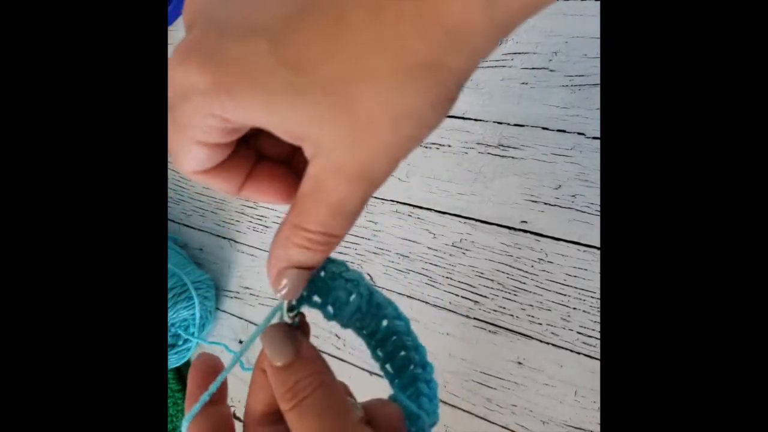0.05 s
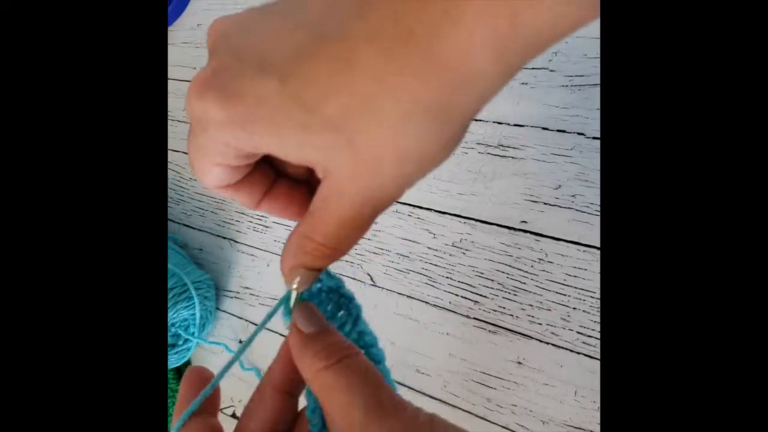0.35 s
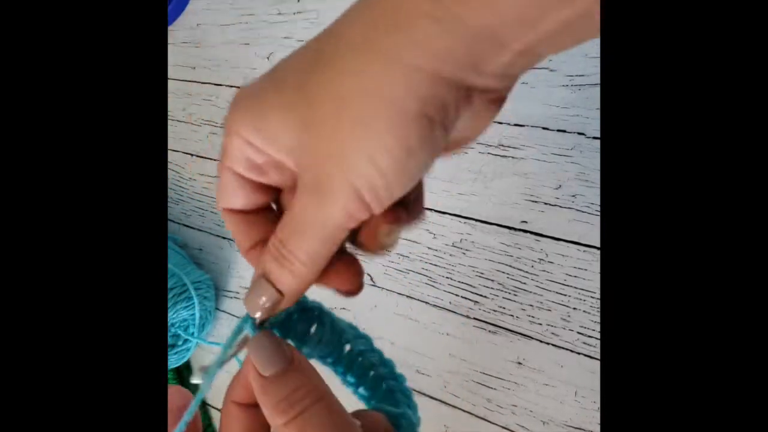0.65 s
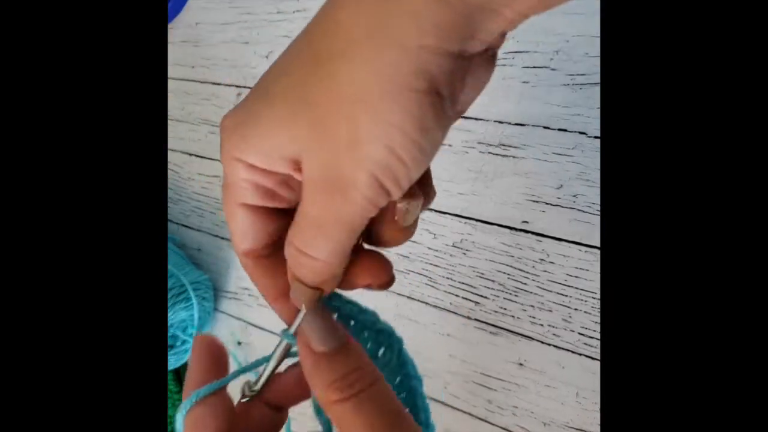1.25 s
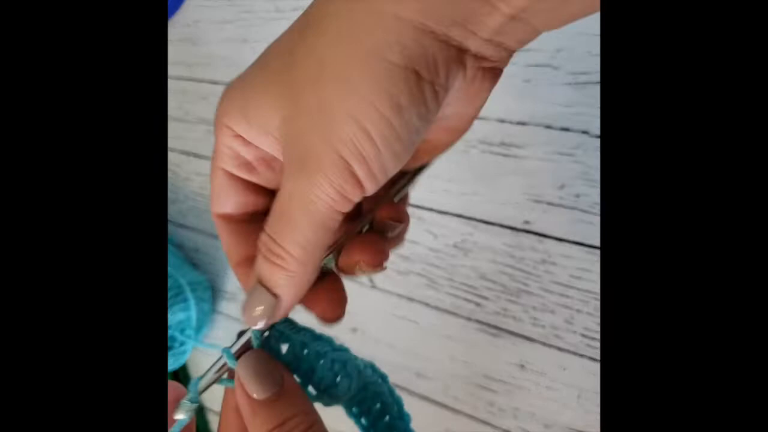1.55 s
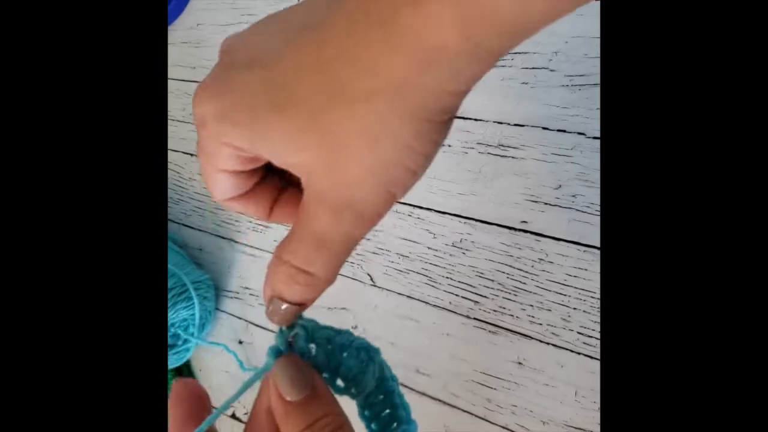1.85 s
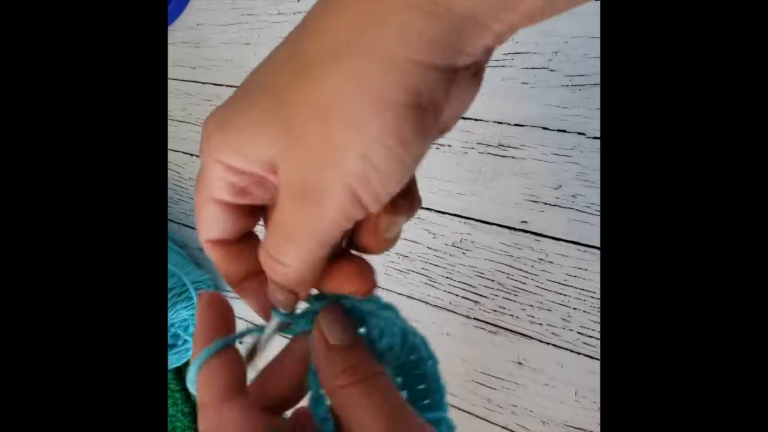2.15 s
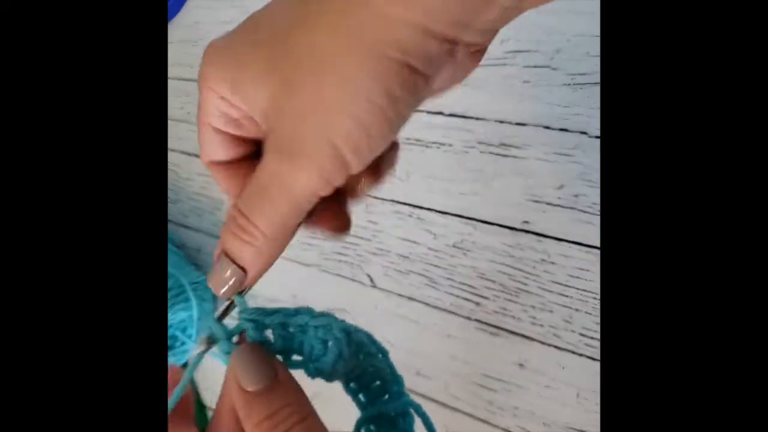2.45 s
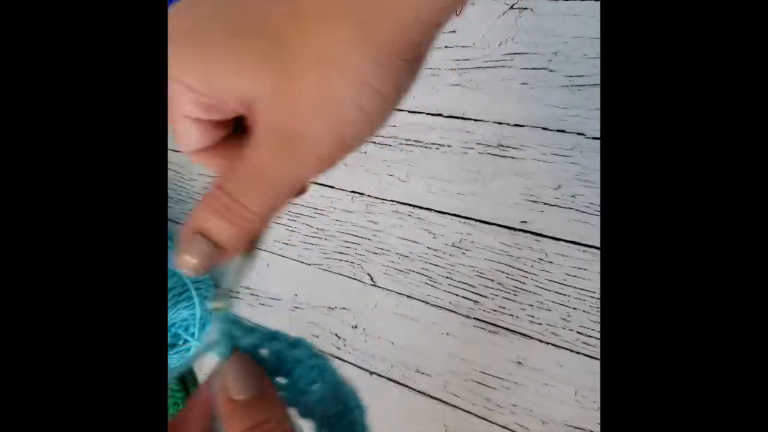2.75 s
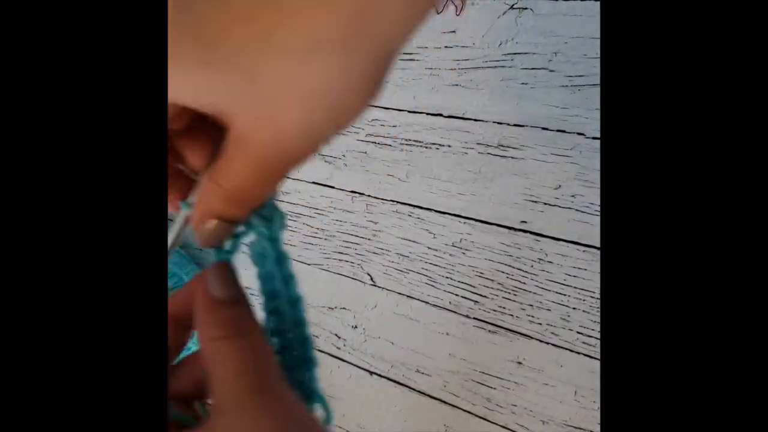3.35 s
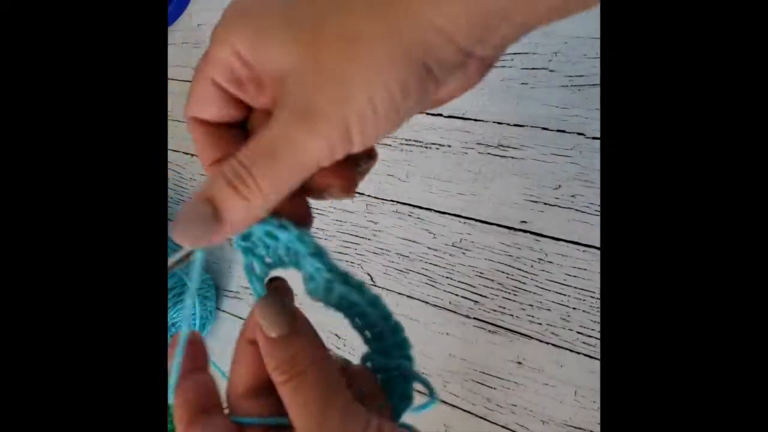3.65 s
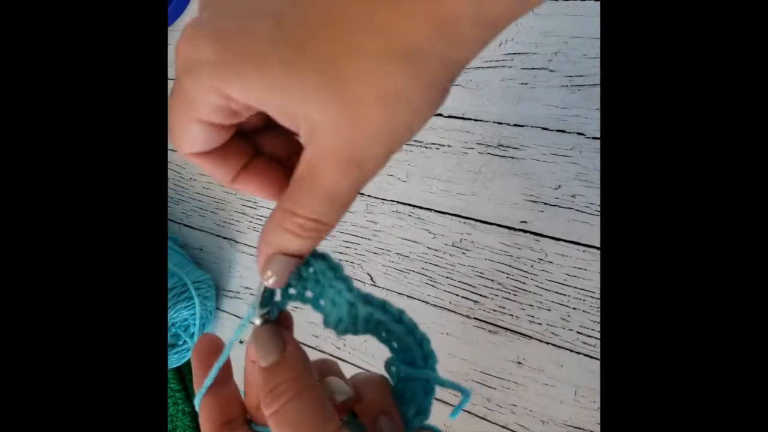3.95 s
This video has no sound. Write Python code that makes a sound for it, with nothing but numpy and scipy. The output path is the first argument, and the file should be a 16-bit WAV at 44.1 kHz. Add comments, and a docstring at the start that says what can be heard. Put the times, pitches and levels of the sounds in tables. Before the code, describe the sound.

Yarn slides softly over a crochet hook in short, close strokes, with hands brushing the work over a steady low room hum. Dull table bumps come at about 0.6 and 0.8 seconds. Around 1.8 to 2 seconds, faint hook taps and fingernail clicks join more bumps. From about 3 seconds, a longer pull of yarn comes with a muffled arm sweep and further bumps, then lighter rustles.

```python
"""Yarn slides over a crochet hook and fingers in soft strokes, its fibres catching and slipping.
Close to the stereo microphones, hands brush the work, fingers rub the hook and an arm sweeps past.
The hook rings with faint taps, fingernails click on it, and dull bumps sound as the hands
nudge the table. Underneath lies a quiet room with a steady mains hum."""
import sys
import numpy as np
from scipy import signal
from scipy.fft import rfft, irfft
from scipy.io import wavfile

SR = 44100
rng = np.random.default_rng(int(sys.argv[2]) if len(sys.argv) > 2 else 0)


def int16_out(signal):
    """Quantize to a 16-bit WAV file."""
    q = np.round(np.clip(np.atleast_2d(signal).T, -1, 1) * 32767)
    wavfile.write(sys.argv[1], SR, q.astype(np.int16))


N = 176400
TIME, HZ = np.arange(N) / SR, np.fft.rfftfreq(N, 1 / SR)


def amp(db):
    """Decibels to gain."""
    return 10 ** (np.asarray(db) / 20)


def sides(pan_db):
    """Stereo gains; pan_db is left minus right."""
    return amp(np.array([[pan_db], [-pan_db]]) / 2)


def curve(points):
    """Draws a curve through the points on a log-frequency axis."""
    hz, value = np.transpose(points)
    return np.interp(np.log(HZ + 1), np.log(hz + 1), value)


def colour(x, left, right):
    """Gives white sound of unit power a spectrum on each side."""
    return irfft(rfft(x) * amp([curve(left), curve(right)]), N) * np.sqrt(SR / 2)


def add(mix, start_s, sound):
    """Mixes a stereo sound in at start_s."""
    part = mix[:, round(start_s * SR):][:, :sound.shape[1]]
    part += sound[:, :part.shape[1]]


def strokes(table):
    """Each movement swells and fades as a lopsided bell; their powers add."""
    power = np.zeros((2, N))
    for peak_s, rise_s, fall_s, db, pan_db in table:
        width_s = np.where(TIME < peak_s, rise_s, fall_s)
        power += (amp(db) * sides(pan_db)) ** 2 * np.exp(-((TIME - peak_s) / width_s) ** 2)
    return np.sqrt(power)


def friction(snaps_per_s=1800, snap_share=0.37, waver_hz=20, waver_db=1.0):
    """Countless fibres catch and slip: a hiss with small snaps, wavering with the grip."""
    snaps = rng.standard_normal((2, N)) * amp(np.minimum(rng.exponential(1, N), 4))
    snaps *= rng.random(N) < snaps_per_s / SR
    grip = irfft(rfft(rng.standard_normal(N)) * np.exp(-(HZ / waver_hz) ** 2), N)
    hiss = np.sqrt(1 - snap_share) * rng.standard_normal((2, N))
    return amp(waver_db * grip / grip.std()) * (np.sqrt(snap_share) * snaps / snaps.std() + hiss)


# How alike the air sounds on both sides: freq_hz, correlation
AIR_LIKENESS = [(100, 1), (250, 0.93), (550, 0.8), (1000, 0.18)]
def airborne(spectrum):
    """Noise that reaches both microphones, centred in the bass and wider above."""
    left, other = rfft(rng.standard_normal((2, N)))
    likeness = curve(AIR_LIKENESS)
    right = likeness * left + np.sqrt(1 - likeness ** 2) * other
    return colour(irfft(np.array([left, right]), N), spectrum, spectrum)


# Mains hum partials: harmonic, level_db, pan_db
HUM_PARTIALS = [(1, -38.25, -0.25), (3, -68.5, -11)]
# Bed of room air and microphone hiss: freq_hz, density_db_per_hz
ROOM_AIR = [(25, -89.5), (60, -77.5), (150, -72.5), (238, -76), (252, -78.5), (280, -81.5), (296, -77.5),
            (312, -87), (435, -87.5), (452, -82.5), (466, -84.5), (497, -84.5), (520, -94), (650, -97.5),
            (760, -113), (1000, -120), (3000, -140)]
MIC_HISS_LEFT = [(1000, -115), (1680, -115), (1950, -118), (3000, -121.5), (7400, -128.5), (12500, -118),
                 (15500, -117)]
MIC_HISS_RIGHT = [(600, -116), (1100, -109.5), (1700, -107.5), (2050, -96.5), (2300, -97), (2600, -100.5),
                  (2900, -108), (3900, -122), (4300, -109), (4900, -110.5), (5800, -121), (6350, -112.5),
                  (7400, -114), (8400, -125), (12500, -118.5), (15500, -118)]
def room(mains_hz=120.015):
    """Mains hum, the low rush of the room and microphone hiss."""
    hum = np.zeros((2, N))
    for harmonic, db, pan_db in HUM_PARTIALS:
        phase = 2 * np.pi * (harmonic * mains_hz * TIME + rng.random())
        hum += amp(db) * sides(pan_db) * np.sqrt(2) * np.sin(phase)
    return hum + airborne(ROOM_AIR) + colour(rng.standard_normal((2, N)), MIC_HISS_LEFT, MIC_HISS_RIGHT)


# Dull nudges of the table: start_s, gain_db, pitch_hz
TABLE_BUMPS = [(0.599, -38, 232), (0.626, -47, 253.5), (0.822, -37, 206), (1.768, -39.5, 236.4),
               (1.794, -45, 278), (1.792, -51.5, 489), (1.992, -36, 208.3), (2.044, -41, 200),
               (2.952, -43.5, 267.3), (2.977, -45, 278), (3.163, -39, 234.6)]
# The table's low body: pitch_ratio, gain_db, t60_s
TABLE_MODES = [(0.798, 7, 0.083), (1, 11.5, 0.084), (1.239, -11, 0.3), (2.049, -21.5, 0.24)]
def table_bumps(rise_s=0.0084):
    """Soft blows swell into the table's low modes."""
    out, t = np.zeros((2, N)), TIME[:SR // 4]
    attack = 1 - np.exp(-(t / rise_s) ** 2)
    for start_s, db, hz in TABLE_BUMPS:
        ring = sum(amp(mode_db - 60 * t / t60) * np.sin(2 * np.pi * hz * ratio * t)
                   for ratio, mode_db, t60 in TABLE_MODES)
        add(out, start_s, amp(db) * sides(pan_db=0.6) * attack * ring)
    return out


# Faint taps of the hook: start_s, level_db, scrape_decay_s
HOOK_TAPS = [(1.7645, -51, 0.0014), (1.772, -60, 0.0016), (1.807, -56, .0015), (1.931, -57, .0008)]
# The hook's short ring: pitch_hz, gain_db, t60_s
HOOK_MODES = [(574, 1, 0.022), (970, 12, 0.02), (1093, 1, 0.035), (1337, -4, 0.039), (1830, -1, 0.016)]
def hook_taps(rise_s=0.0008, scrape_gain=0.89):
    """A contact and a short scrape ring the damped modes of the hand-held hook."""
    out, t = np.zeros((2, N)), TIME[:SR // 12]
    ring = sum((-1) ** k * amp(db - 60 * t / t60) * np.sin(2 * np.pi * hz * t)
               for k, (hz, db, t60) in enumerate(HOOK_MODES))
    ring *= 1 - np.exp(-t / rise_s)
    for start_s, db, decay_s in HOOK_TAPS:
        scrape = rng.standard_normal(len(t)) * np.exp(-t / decay_s)
        tap = ring + scrape_gain * signal.fftconvolve(scrape / np.linalg.norm(scrape), ring)[:len(t)]
        tap *= np.sqrt(0.0015 * SR) / np.linalg.norm(tap)  # the energy of 1.5 ms at unit power
        add(out, start_s, amp(db) * sides(pan_db=-5) * tap)
    return out


# Dry fingernail clicks on the hook: start_s, peak_db, pitch_hz, decay_s
NAIL_CLICKS = [(1.765, -57.5, 2300, .0016), (1.7705, -60, 1400, .002), (1.786, -55, 2150, .0006),
               (1.811, -56, 1350, .0008), (1.9278, -59, 1100, .0006), (1.9554, -47, 1150, .00036),
               (2.036, -60.5, 1200, .0007)]
def nail_clicks(smear_hz=200):
    """A nail snaps against the hook; its scratch smears the pitch and the grip damps it at once."""
    out, t = np.zeros((2, N)), TIME[:SR // 30]
    for start_s, db, hz, decay_s in NAIL_CLICKS:
        scratch = np.cumsum(rng.standard_normal(len(t))) * np.sqrt(2 * np.pi * smear_hz / SR)
        envelope = t / decay_s * np.exp(1 - t / decay_s)
        add(out, start_s, amp(db) * sides(pan_db=-5) * envelope * np.sin(2 * np.pi * hz * t + scratch))
    return out


# Passes of the arm: peak_s, rise_s, fall_s, gain_db, pan_db
ARM_SWEEPS = [(3.01, 0.03, 0.12, -12, -2), (3.122, 0.015, 0.028, -1.5, -2), (3.28, 0.12, 0.14, -12, -0.5),
              (3.68, 0.079, 0.084, -14, -1)]
# Their muffled tone: freq_hz, density_db_per_hz
ARM_TONE = [(120, -85), (300, -85.5), (390, -78.5), (480, -72), (590, -74), (820, -99), (1600, -105),
            (5000, -135)]
def arm():
    """The arm sweeps by with a dull rustle."""
    return airborne(ARM_TONE) * strokes(ARM_SWEEPS)


# Hand brushes and finger rubs: peak_s, rise_s, fall_s, gain_db, pan_db
HAND_BRUSHES = [(.38, .025, .03, -9.5, -7), (.51, 0.045, 0.032, -8, -4), (1.0, .03, .05, 1.5, 2.5),
                (1.31, 0.026, 0.025, -12.5, 0), (1.49, .02, 0.047, -9, -2.5), (1.8, 0.018, 0.03, -2, -2),
                (1.995, 0.022, 0.045, -1.5, 3), (2.385, 0.018, .015, -9, -2.5),
                (2.555, 0.016, 0.031, -7, -3.5), (3.14, 0.085, 0.093, -2, -2.5),
                (3.28, 0.05, 0.08, -6.5, -4), (3.68, 0.022, 0.037, -9, -3)]
FINGER_RUBS = [(1.997, 0.044, .055, -0.5, -1), (2.745, .025, 0.057, -4, -1.5), (3.13, 0.025, 0.06, 3, 1)]
# Papery brush tone and darker rub tone: freq_hz, density_db_per_hz
BRUSH_LEFT = [(1100, -113), (1400, -108), (1700, -101), (2100, -106), (2550, -100), (3050, -116),
              (8000, -135)]
BRUSH_RIGHT = [(900, -110), (1700, -100), (2300, -92), (3100, -108), (8000, -125)]
RUB_TONE = [(500, -89.5), (750, -97.5), (1150, -99.5), (1450, -105), (1800, -103), (4000, -135)]
def hands():
    """Skin brushes skin and the work, and fingers rub along the hook."""
    brushing = colour(friction() * strokes(HAND_BRUSHES), BRUSH_LEFT, BRUSH_RIGHT)
    rubbing = colour(friction() * strokes(FINGER_RUBS), RUB_TONE, RUB_TONE)
    return brushing + rubbing


# Short slides and one long pull of yarn: peak_s, rise_s, fall_s, gain_db, pan_db
YARN_SLIDES = [(.34, .05, 0.036, -11, -5), (.45, .03, 0.042, -9, -4), (.74, 0.04, 0.13, -10, -1),
               (1.0, 0.11, 0.098, -7.5, -4), (1.48, 0.046, 0.046, -7.5, 1), (1.66, 0.069, 0.061, -9.5, -1),
               (1.79, 0.036, .08, -0.5, 2.5), (2.02, 0.049, 0.1, -7, 0), (2.35, 0.11, 0.057, -9, 3),
               (2.61, 0.043, 0.039, -2, 2.5), (2.72, .06, 0.091, -9, 12), (2.81, 0.044, 0.14, -3, 0.5),
               (3.06, 0.059, 0.049, 2, 1), (3.29, 0.07, 0.084, -7, 3), (3.57, 0.087, 0.17, -6.5, 1.5),
               (3.98, 0.036, 0.053, -6, 0)]
YARN_PULL = [(3.23, 0.13, .15, 2, -1)]
# Fibres snapping off the hook: start_s, gain_db, pan_db
FIBRE_TICKS = [(1.152, -3, 3), (2.35, -0.5, 2), (2.385, -4, 0), (2.893, -1, -8)]
# Airy tone of the slides and narrow rasp of the pull: freq_hz, density_db_per_hz
SLIDE_LEFT = [(800, -122), (2500, -117), (7500, -120), (9000, -114), (12000, -107), (14000, -103.5),
              (15800, -104.5)]
SLIDE_RIGHT = [(800, -120), (1700, -112), (2300, -99), (3700, -116), (4500, -103), (5600, -110),
               (6500, -103), (7500, -103), (8800, -111), (12000, -114), (15800, -116)]
RASP_LEFT = [(3000, -125), (3400, -112), (3900, -107), (5200, -132)]
RASP_RIGHT = [(900, -125), (1200, -102), (1600, -120), (2250, -99), (3300, -106.5), (3900, -117),
              (4350, -99), (5800, -124), (6400, -106), (7200, -106.5), (8300, -132)]
def yarn(tick_decay_s=0.003, tick_boost_db=8.5):
    """Yarn drawn through the stitches and once pulled long, with single fibres snapping free."""
    sliding, t = friction() * strokes(YARN_SLIDES), TIME[:SR // 40]
    for start_s, db, pan_db in FIBRE_TICKS:
        bright_noise = np.diff(rng.standard_normal((2, len(t) + 1))) / 2
        tick = np.exp(-t / tick_decay_s) * bright_noise
        add(sliding, start_s, amp(db + tick_boost_db) * sides(pan_db) * tick)
    pulling = friction() * strokes(YARN_PULL)
    return colour(sliding, SLIDE_LEFT, SLIDE_RIGHT) + colour(pulling, RASP_LEFT, RASP_RIGHT)


def scene():
    """The handwork over the room tone."""
    return room() + yarn() + hands() + arm() + table_bumps() + hook_taps() + nail_clicks()


def record(dry, cutoff_hz=15760):
    """The recorder's band limit cuts the highest treble."""
    lowpass = signal.firwin(1023, cutoff_hz, window=("kaiser", 9), fs=SR)
    return signal.oaconvolve(dry, lowpass[None], "same")


dry = scene()
out = record(dry)
int16_out(out)
```